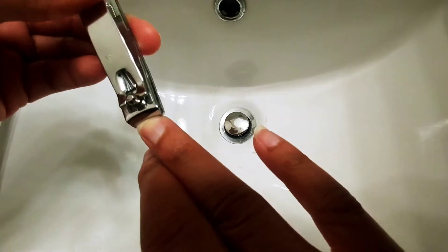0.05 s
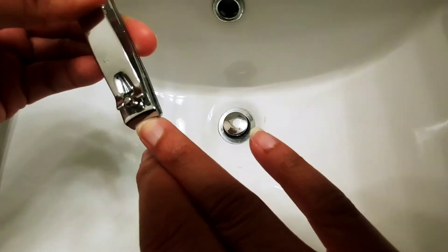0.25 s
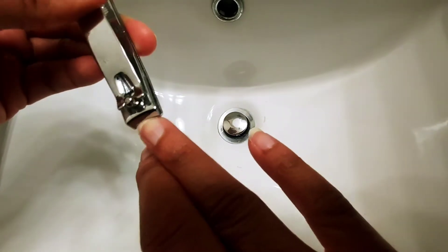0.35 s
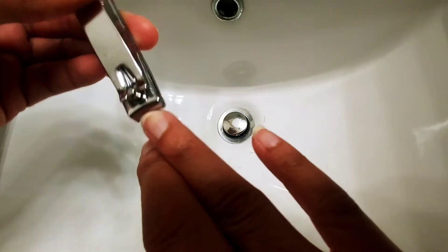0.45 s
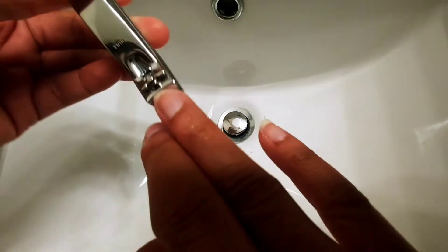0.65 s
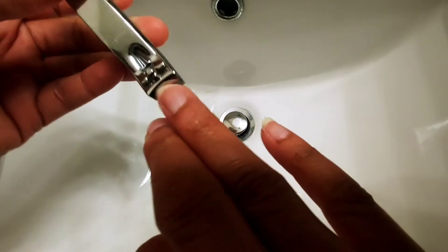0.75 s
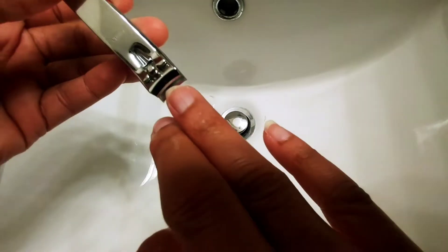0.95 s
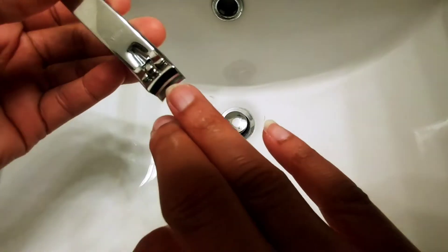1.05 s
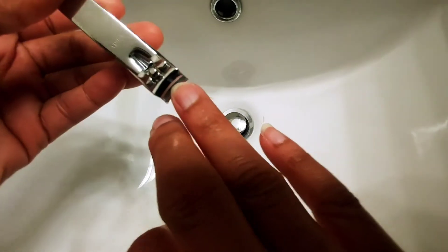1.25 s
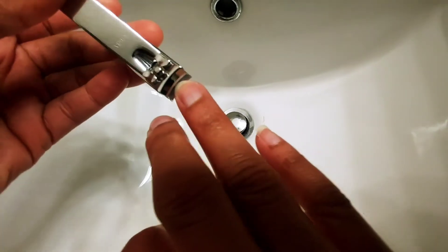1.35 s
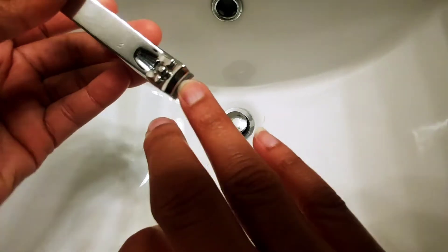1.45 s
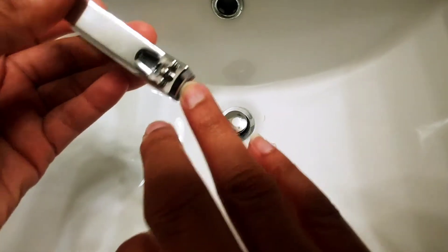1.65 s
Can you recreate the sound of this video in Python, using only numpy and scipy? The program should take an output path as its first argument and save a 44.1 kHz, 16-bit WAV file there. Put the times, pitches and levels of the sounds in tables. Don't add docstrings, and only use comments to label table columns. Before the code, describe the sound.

Near-silent bathroom with faint fan hum, then a piercing steel nail clipper click close to the microphone, slightly overloaded, with a short tiled echo cut off quickly, two tiny ticks on ceramic, and very faint finger rubbing.

```python
import sys
import numpy as np
from scipy import signal
from scipy.fft import rfft, irfft
from scipy.io import wavfile

SR = 44100
rng = np.random.default_rng(int(sys.argv[2]) if len(sys.argv) > 2 else 0)


def ratio(d):
    e = np.asarray(d, float) / 20
    return 10 ** e


def master_out(mix):
    frames = np.transpose(np.atleast_2d(mix))
    ceiling = np.clip(frames, -1, 1)
    pcm = np.round(ceiling * 32767).astype(np.int16)
    wavfile.write(sys.argv[1], SR, pcm)


N = 74970


def evened(x):
    return x / np.sqrt(np.mean(x ** 2) + 1e-20)


def read(points, hz):
    point_hz, value = np.transpose(points)
    return np.interp(np.log(hz + 1), np.log(point_hz + 1), value)


def add(mix, start_s, sound):
    part = mix[..., round(start_s * SR):][..., :sound.shape[-1]]
    part += sound[..., :part.shape[-1]]


def ring(modes, touch_s, shorten=1):
    t = np.arange(1500) / SR
    total = 0
    for hz, level_db, t60_s in modes:
        total = total + ratio(level_db - 60 * t / t60_s / shorten) * np.sin(2 * np.pi * hz * t)
    return (1 - np.exp(-t / touch_s)) * total


def band(hz, width_hz, size):
    radius = np.exp(-np.pi * width_hz / SR)
    noise = rng.standard_normal(size + SR) + 1j * rng.standard_normal(size + SR)
    low = signal.lfilter([1], [1, -2 * radius, radius * radius], noise)[SR:]
    carrier = np.exp(2j * np.pi * hz * np.arange(size) / SR)
    return evened((low * carrier).real)


def shaped(x, field_db):
    hz, t, z = signal.stft(x, SR, nperseg=128)
    z = z * ratio(field_db(hz[:, None], t))
    return signal.istft(z, SR, nperseg=128)[1][..., :x.shape[-1]]


def taps(length_s):
    shape = (2, int(length_s * SR))
    return rng.standard_normal(shape) * (rng.random(shape) < .12)


SNAP_S, RIGHT_LAG_S, SNAP_DB = .2313, .0004, -2
TOUCH_S = 0.00016
SMEAR = 0.29
TILES_LEFT_DB, TILES_RIGHT_DB, BUILD_S, HOLD_S = 7, 11, 0.0072, .021
# pitch_hz, left_db, right_db, t60_s
JAW_MODES = [(1270, -13, -39.5, .003), (3230, -15, -12.5, 0.0049), (4506, -13, -10.5, 0.008),
             (6720, -12, 0, 0.0074), (8800, 1, 12, 0.0049), (9740, -4.5, -4.5, .010),
             (10760, -8, -16, 0.0073), (12300, -1, -12.5, .010), (14420, -9.5, -9.5, 0.013),
             (14920, -15, -17.5, .005)]
# delay_s, level_db
LEFT_ECHOES = [(.0016, 8.5), (.0068, -9), (.0099, -6.5), (.0119, -14.5), (.0146, -13.5), (.0173, 5.5),
               (.0196, 3.5), (.0228, -9.5)]
# delay_s, level_db
RIGHT_ECHOES = [(.0024, -10.5), (.0063, -9.5), (.0072, -5), (.0083, -7), (.0128, -15), (.0149, -9),
                (.0177, -6), (.0338, -11)]
# freq_hz, t60_s
TILE_T60 = [(400, 0.19), (1500, 0.14), (3000, .17), (5500, 0.1806), (9500, 0.1733), (12500, 0.094),
            (15000, 0.089)]
# freq_hz, level_db
TILE_COLOUR = [(400, -21.5), (1500, -14.5), (3000, 0), (4800, 3), (7200, -10), (9700, 0.5), (12300, 7),
               (15000, -1.5)]


def snap():
    out, jaws = np.zeros((2, N)), np.array(JAW_MODES)
    tail = shaped(taps(.5), lambda hz, t: -60 * np.maximum(t - HOLD_S, 0) / read(TILE_T60, hz))
    tail = tail * np.minimum(np.arange(tail.shape[1]) / SR / BUILD_S, 1)
    tail = ratio([[TILES_LEFT_DB], [TILES_RIGHT_DB]]) * tail / np.linalg.norm(tail[0])

    mean_modes = np.c_[jaws[:, 0], jaws[:, 1:3].mean(axis=1), jaws[:, 3]]
    room_ring = ring(mean_modes, TOUCH_S, SMEAR) / np.sqrt(SMEAR)
    lead = 128
    room_ring = np.r_[np.zeros(lead), room_ring]
    room_ring = shaped(room_ring, lambda hz, t: read(TILE_COLOUR, hz) + 0 * t)

    for ear, echoes in enumerate((LEFT_ECHOES, RIGHT_ECHOES)):
        start_s = SNAP_S + ear * RIGHT_LAG_S
        add(out[ear], start_s, ring(jaws[:, [0, 1 + ear, 3]], TOUCH_S))
        for delay_s, level_db in echoes:
            scatter = rng.standard_normal(40) * ratio(-.25 * np.arange(40))
            add(tail[ear], delay_s, ratio(level_db) * scatter / np.linalg.norm(scatter))
        add(out[ear], start_s, signal.fftconvolve(tail[ear], room_ring)[lead:])
    return ratio(SNAP_DB) * out


WASH_DB, WASH_RISE_S, WASH_REF_S, CLOSE_S = -49, 0.012, .39, 0.44
# freq_hz, level_db
WASH_COLOUR = [(300, -14.5), (700, -13.5), (1300, -14.5), (4700, -9), (7600, -15), (9700, 0.5),
               (11300, -11), (15500, -21.5)]
# freq_hz, t60_s
WASH_T60 = [(500, 1.5), (2000, 0.89), (4500, 0.39), (9700, 0.387), (15000, 0.18)]
# freq_hz, fall_db_per_s
CLOSING = [(500, 300), (7500, 244), (9700, 56), (12000, 250)]


def far_walls():
    out = np.zeros((2, N))
    noise = rng.standard_normal((2, SR // 2))
    unit = np.std(shaped(noise, lambda hz, t: read(WASH_COLOUR, hz) + 0 * t))

    def field_db(hz, t):
        decay_db = 60 * (t - (WASH_REF_S - SNAP_S)) / read(WASH_T60, hz)
        closing_db = read(CLOSING, hz) * np.maximum(t + SNAP_S - CLOSE_S, 0)
        return read(WASH_COLOUR, hz) - decay_db - closing_db

    rise = np.minimum(np.arange(SR // 2) / SR / WASH_RISE_S, 1)
    add(out, SNAP_S, shaped(noise, field_db) / unit * rise)
    return ratio(WASH_DB) * out


BASIN_DB, BASIN_T60_S, CHIP_TOUCH_S = 0.5, 0.16, 0.00021
# start_s, left_db, right_db
CHIP_HITS = [
    (0.4997, -36, -35),
    (0.5016, -43, -42),
    (.5038, -57, -54),
    (0.5345, -37.5, -55),
    (.5359, -72, -57),
]
# pitch_hz, level_db, t60_s
CHIP_MODES = [(4900, -15, .003), (7000, -29, .003), (8500, -1, 0.0033), (9100, -5.5, 0.0059),
              (12100, -13, 0.0044), (14600, -6, .004)]


def bounces():
    hits = np.zeros((2, N))
    for start_s, left_db, right_db in CHIP_HITS:
        add(hits, start_s, ratio([[left_db], [right_db]]) * ring(CHIP_MODES, CHIP_TOUCH_S))
    tail = taps(.25) * ratio(-60 * np.arange(int(.25 * SR)) / SR / BASIN_T60_S)
    tail = tail / np.linalg.norm(tail[0])
    wet = signal.fftconvolve(hits.mean(axis=0)[None], tail, axes=1)[:, :N]
    return hits + ratio(BASIN_DB) * wet


JOLT_S, JOLT_HZ, JOLT_DB, JOLT_T60_S, JOLT_RISE_S = .2395, 56, -17, 0.061, 0.0025


def jolt():
    out, t = np.zeros((2, N)), np.arange(SR // 8) / SR
    push = ratio(JOLT_DB - 60 * t / JOLT_T60_S) * np.sin(2 * np.pi * JOLT_HZ * t)
    add(out[0], JOLT_S, push * (1 - np.exp(-t / JOLT_RISE_S)))
    add(out[0], JOLT_S - .007, -ratio(-34.5) * np.hanning(400))
    return out


def stroke(start_s, length_s, bands, shape):
    out, size = np.zeros((2, N)), int(length_s * SR)
    sound = np.array([sum(ratio(level_db) * band(hz, width_hz, size) for hz, width_hz, level_db in bands)
                      for ear in range(2)])
    add(out, start_s, sound * shape(np.arange(size) / size))
    return out


# freq_hz, width_hz, level_db
RUB_BANDS = [(1550, 900, -73), (8500, 2400, -76.5), (14600, 1200, -72)]
# freq_hz, width_hz, level_db
KNOCK_BANDS = [(165, 50, -65.5), (430, 120, -60)]
# freq_hz, width_hz, level_db
SHIFT_BANDS = [(1550, 1050, -73), (3360, 3500, -82)]


def handling():
    rub = stroke(.7, .085, RUB_BANDS, lambda u: np.minimum(u / 0.045, 1) * (1 - u ** 2))
    knock = stroke(.68, .085, KNOCK_BANDS, lambda u: np.sin(np.pi * u))
    shift = stroke(1.0, .4, SHIFT_BANDS, lambda u: np.sin(np.pi * u))
    return rub + knock + shift


AIR_DB, AIR_FLOOR_HZ = -66, 140
# freq_hz, level_db
AIR_COLOUR = [(82, -33.5), (140, 0), (185, -12), (234, -7), (459, -15), (629, -8), (934, -18),
              (1280, -21.5), (15800, -35.5)]
# time_s, level_db
AIR_DRIFT = [(0, 0), (0.041, -3), (.22, -2), (.3, 1), (.6, -1), (.8, -0.5), (1.1, 1), (1.4, -1), (1.7, -1)]
# freq_hz, correlation
AIR_LIKENESS = [(60, 0.907), (240, 0.68), (950, 0.15), (3770, -0.31), (15000, 0.42)]
# freq_hz, difference_db
AIR_BALANCE = [(60, -1.5), (240, 1), (950, -1.5), (3770, -2), (15000, 1)]


def air():
    hz = np.fft.rfftfreq(N, 1 / SR)
    left, other = rfft(rng.standard_normal((2, N)))
    same = np.clip(read(AIR_LIKENESS, hz), -1, 1)
    right = same * left + np.sqrt(1 - same ** 2) * other
    colour_db = read(AIR_COLOUR, hz) + np.outer([.5, -.5], read(AIR_BALANCE, hz))
    z = np.array([left, right]) * ratio(colour_db)
    tone = evened(irfft(z * (hz > AIR_FLOOR_HZ), N))
    return tone * ratio(AIR_DB + np.interp(np.arange(N) / SR, *np.transpose(AIR_DRIFT)))


HUM_HZ, HUM_DB, HUM_WIDTH_HZ = 120.3, -64, 6.3
RUMBLE_HZ, RUMBLE_WIDTH_HZ = 58.5, 42
SUB_HZ, SUB_DB, SUB_WIDTH_HZ = 32.87, -81.5, 14
# time_s, level_db
RUMBLE_SWELLS = [
    [(0.0, -56), (0.036, -88), (0.068, -65), (0.102, -85), (0.108, -82), (0.19, -64)],
    [(0.29, -57), (0.304, -60), (0.716, -66), (0.732, -84), (0.846, -59), (1.0, -60)],
    [(1.0, -63.5), (1.128, -62.5), (1.238, -83), (1.488, -61), (1.662, -71), (1.7, -85)],
]


def fan():
    t = np.arange(N) / SR
    hum = np.sin(2 * np.pi * HUM_HZ * t) + 0.39 * band(HUM_HZ, HUM_WIDTH_HZ, N)
    hum = ratio(HUM_DB) * evened(hum)
    rumble = np.sin(2 * np.pi * RUMBLE_HZ * t) + 0.49 * band(RUMBLE_HZ, RUMBLE_WIDTH_HZ, N)
    rumble = ratio(np.interp(t, *np.vstack(RUMBLE_SWELLS).T)) * evened(rumble)
    apart = ratio(-71) * np.array([band(67, 50, N), band(75, 50, N)])
    sub = ratio(SUB_DB) * band(SUB_HZ, SUB_WIDTH_HZ, N)
    return (hum + rumble + sub) * ratio([[.5], [-.5]]) + apart


def scene():
    return snap() + far_walls() + bounces() + jolt() + handling() + air() + fan()


def band_limit(x):
    return signal.sosfilt(signal.butter(12, 16480, fs=SR, output="sos"), x)


def record(dry):
    edge = signal.firwin(255, 15900, window=("kaiser", 8), fs=SR)[None]
    mix = signal.oaconvolve(np.clip(dry, -1, 1), edge, "same")
    return band_limit(mix)


dry = scene()
out = record(dry)
master_out(out)
```